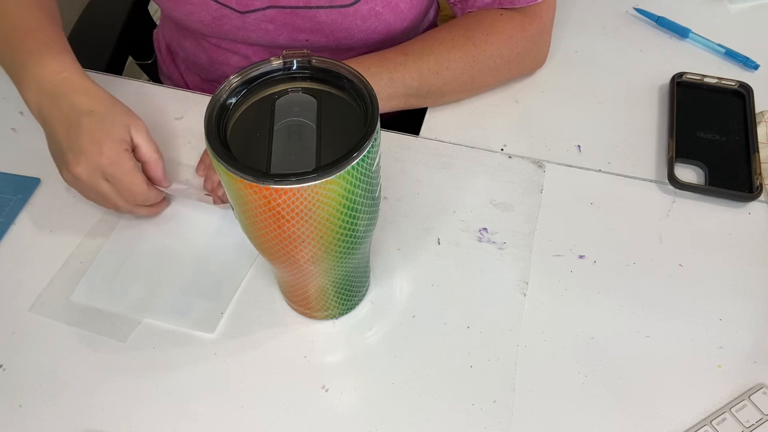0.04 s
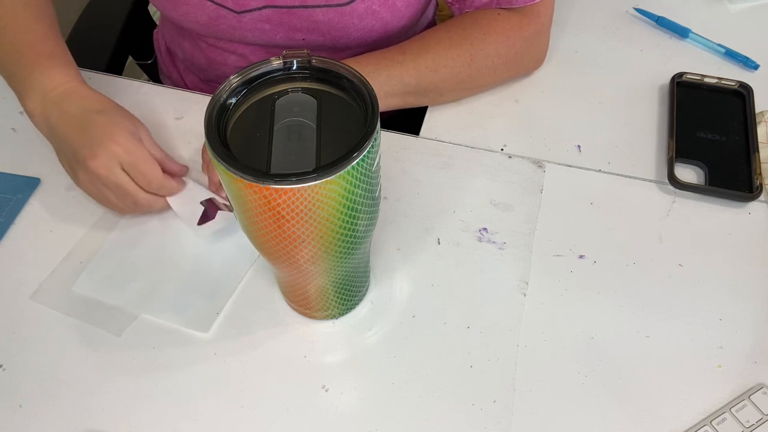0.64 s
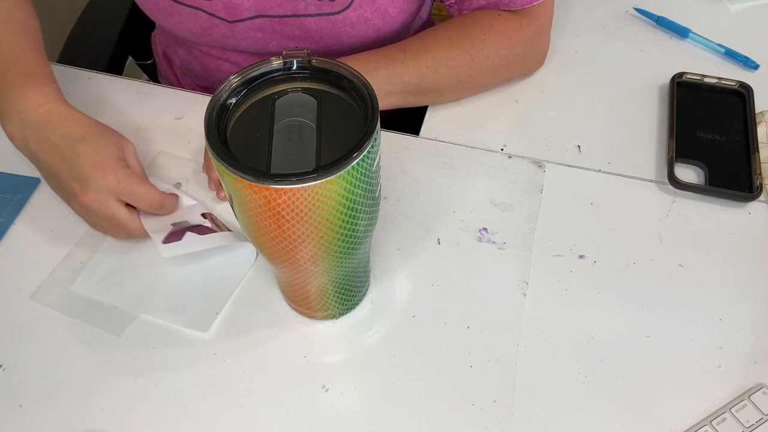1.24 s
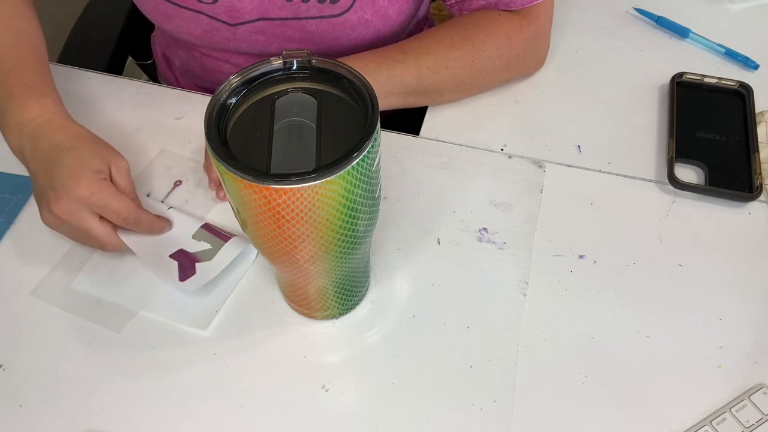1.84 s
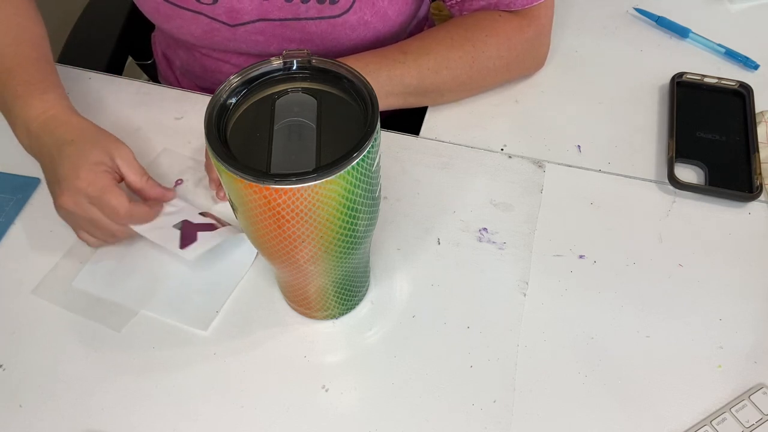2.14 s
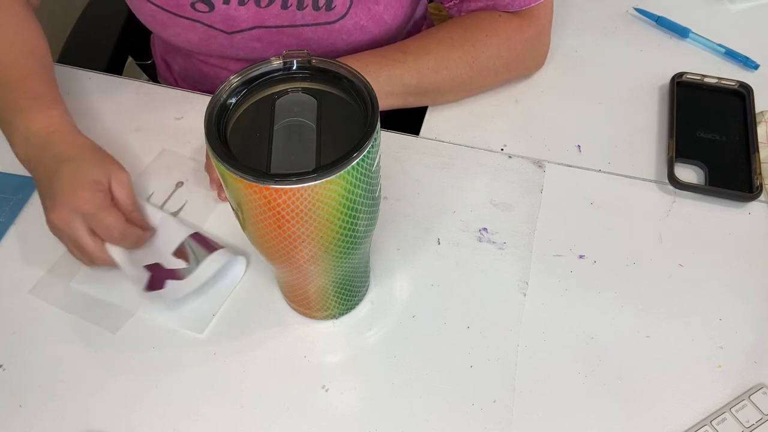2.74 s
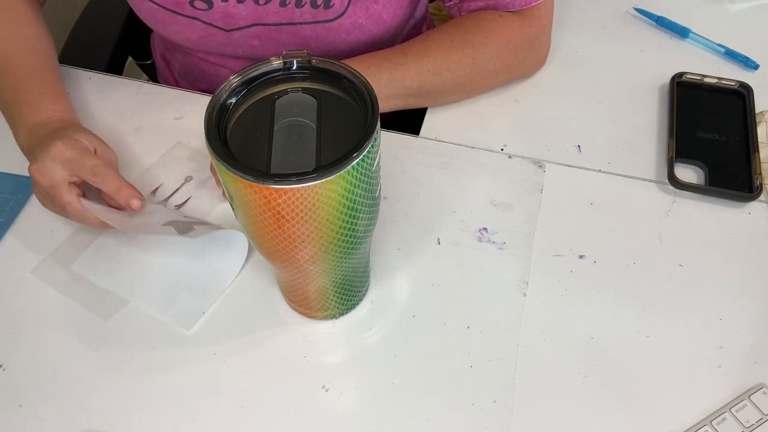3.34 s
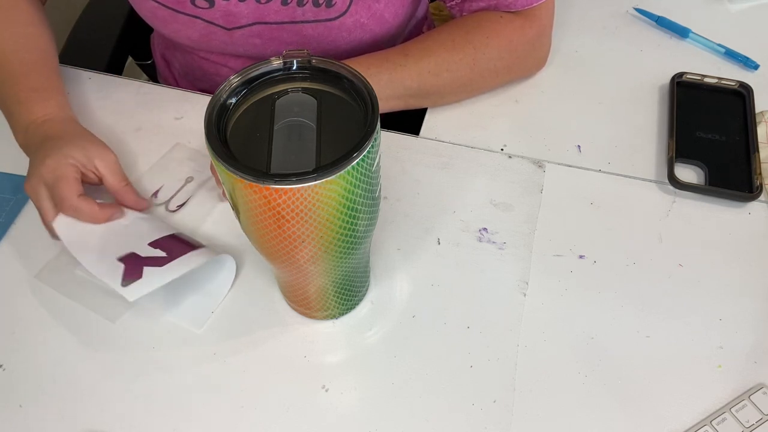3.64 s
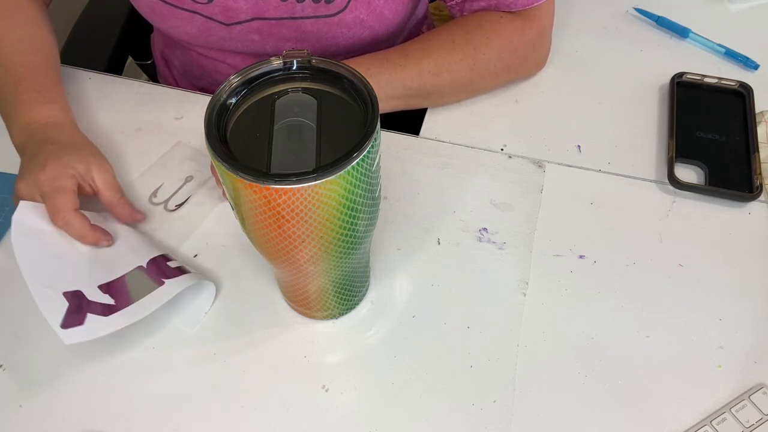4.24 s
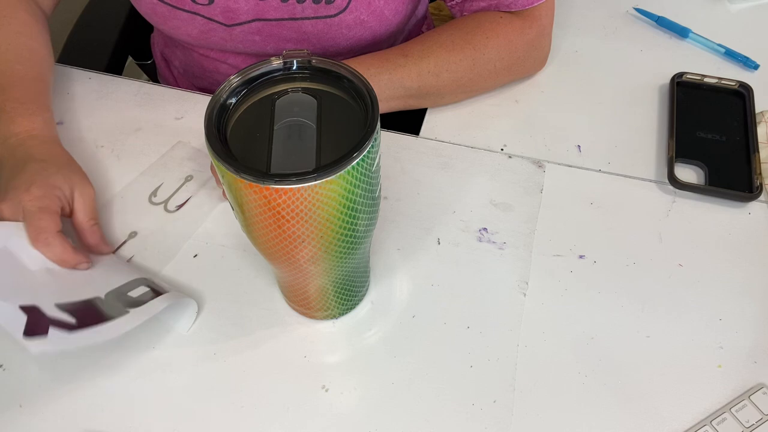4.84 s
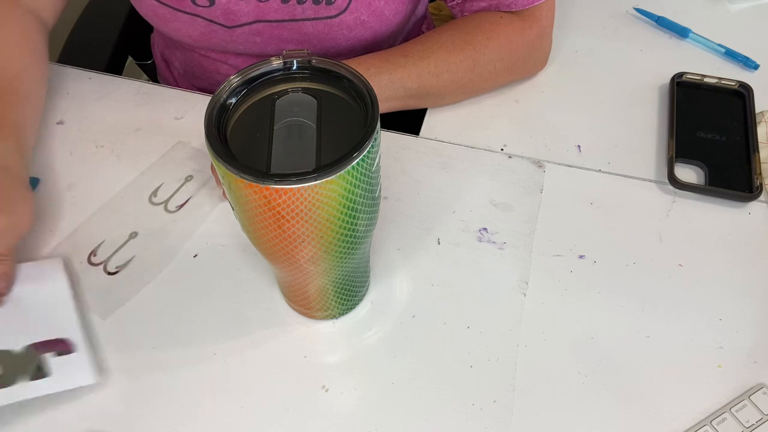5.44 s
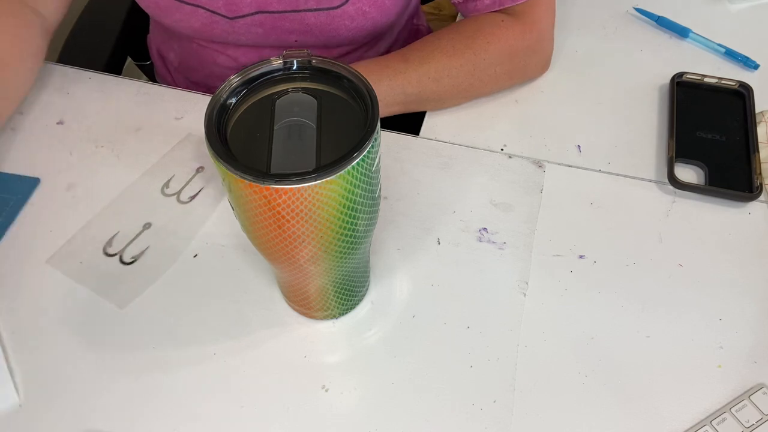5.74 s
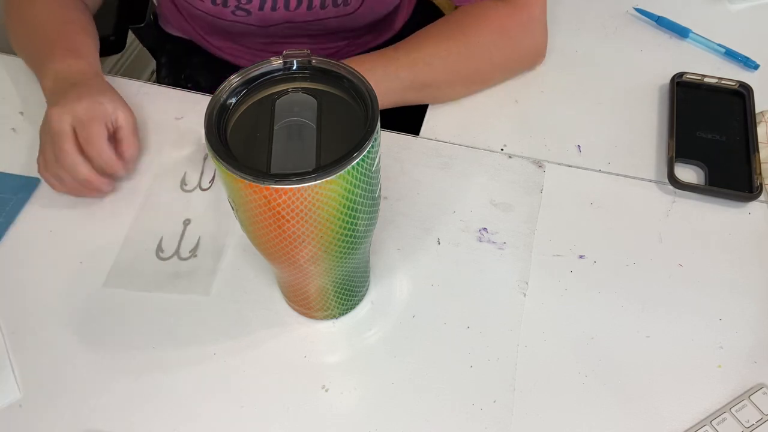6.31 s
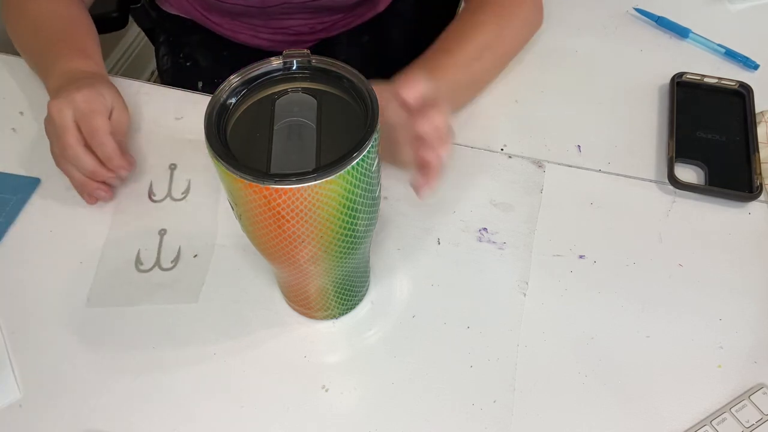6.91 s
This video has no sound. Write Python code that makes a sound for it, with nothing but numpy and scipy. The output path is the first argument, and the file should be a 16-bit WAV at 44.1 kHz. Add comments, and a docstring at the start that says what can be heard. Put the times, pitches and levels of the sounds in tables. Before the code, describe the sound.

Close crackling and sliding of a stiff vinyl sheet being handled, then an arm bumps down on a hollow table.

```python
"""Peeling a vinyl decal

A decal sheet is picked off its transfer tape on a table in a small room, heard from close by.
The stiff film buckles in sharp snaps, ticks as tiny creases give way, and hisses as it slides.
Then the sheet is put aside and an arm comes down, thumping and rubbing the hollow table."""
import sys
import numpy as np
from scipy import signal
from scipy.fft import rfft, irfft, next_fast_len
from scipy.io import wavfile
from scipy.ndimage import uniform_filter1d, map_coordinates

SR = 44100
rng = np.random.default_rng(int(sys.argv[2]) if len(sys.argv) > 2 else 0)


def digitize_waveform(pressure):
    """Quantize a signal to 16-bit integers and store it at the path in sys.argv[1].

    Rows of a 2-D input are taken as channels; values are limited to [-1, 1].
    """
    field = np.atleast_2d(pressure).T
    bounded = np.clip(field, -1, 1)
    quanta = np.round(bounded * 32767).astype(np.int16)
    wavfile.write(sys.argv[1], SR, quanta)


N = 311787  # samples, about 7 s

# Levels in the tables are relative; the functions set the final loudness.
# the quiet room's own noise: f/Hz, level/dB
ROOM_TONE = [(30, -13.5), (100, -15), (240, -14.5), (540, -15.5), (2000, -21.5), (8200, -24),
             (15000, -31.5)]
# how long the room echoes: f/Hz, time to fade by 60 dB/s
ROOM_DECAY = [(150, 0.95), (1000, 0.48), (4000, 0.35), (8000, 0.34), (15000, 0.2)]
# how busy the hands are: t/s, level/dB
HAND_ACTIVITY = [(0, -10), (.2, -7), (.85, -7), (1.1, -2), (1.43, -8.5), (1.8, -1.5), (2.9, 2),
                 (3.55, -5.5), (4.2, -1.5), (5.2, -10), (6.6, -12), (7.05, -38)]
# rumble of hands resting on the table: f/Hz, level/dB
RESTING_SPECTRUM = [(20, -20.5), (45, -8), (62, 1.5), (80, -0.5), (110, -3), (200, -17), (400, -24.5),
                    (700, -23.5), (1500, -52.5)]
# notes the hollow table rings at: f/Hz, level/dB, time to fade by 60 dB/s
TABLE_MODES = [(77.5, 3.5, 0.4), (121, -29.5, 0.26), (186.8, -17.5, 0.25)]
# hand and arm bump the table: t/s, level/dB
BUMPS = [(0.27, -48.5), (0.907, -47.5), (1.338, -50.5), (1.566, -47), (2.341, -54), (2.85, -51.5),
         (2.996, -47.5), (3.925, -55), (5.378, -49), (5.584, -30), (5.599, -20.5), (5.7, -23),
         (5.745, -31.5), (5.782, -28), (5.849, -27.5), (6.085, -41), (6.344, -51), (6.491, -50)]
# fingers, then the arm, drag over the table: t/s, level/dB, fade/(dB per s)
DRAGS = [(0.496, -57.5, 150), (1.07, -57.5, 150), (1.25, -61, 110), (1.555, -56, 198), (2.495, -58.5, 256),
         (3.06, -66, 12), (3.378, -53, 262), (4.545, -58.5, 159), (5.35, -50, 75), (5.578, -42.5, 28.5),
         (6.038, -45, 39.5), (6.27, -54.5, 33.5), (6.51, -61, 147)]
# skin and sleeve rubbing the table: f/Hz, level/dB
RUB_SPECTRUM = [(55, -27.5), (90, -22), (115, -7), (160, -20.5), (270, -21), (480, -25), (680, -27.5),
                (990, -27), (1400, -38), (2200, -42.5), (3500, -65.5)]
# film peels or slides on film: start t/s, end t/s, hiss level/dB, hiss change/dB, scrape over hiss/dB
FILM_STROKES = [(0.079, 0.268, -56.5, 4, -9), (0.378, 0.584, -60, -7.5, -1.5), (0.862, 0.929, -53, 22.5, 0),
                (0.938, 1.007, -60, -14.5, 7), (1.009, 1.129, -46.5, 9, -9), (1.266, 1.331, -57, 30.5, 3.5),
                (1.456, 1.603, -58, 15.5, -2), (1.723, 1.94, -59.5, 4.5, 2), (2.46, 2.512, -76, 13, 20),
                (2.507, 2.615, -45, 1, -13.5), (2.614, 2.742, -47, 5.5, -8), (2.742, 2.83, -54, 9, 4),
                (3.037, 3.444, -64.5, 5.5, 2), (3.588, 3.7, -56.5, 14, -3.5), (3.818, 3.918, -61.5, 2, 0.5),
                (4.218, 4.334, -56.5, 7, -4), (4.46, 4.53, -60, -4, -8.5), (4.542, 4.562, -65, 7.5, 16),
                (4.597, 4.875, -57.5, 11.5, -10), (4.89, 5.052, -59.5, 4, -3),
                (5.26, 5.308, -62.5, 9.5, -7), (5.342, 5.383, -56, -19, 6.5), (5.482, 5.6, -58, 6, -11),
                (5.641, 5.688, -46.5, 3, 3), (5.72, 5.811, -60, 0, 7.5), (5.836, 5.942, -60, -11, -1.5),
                (6.004, 6.105, -58, 12, 0), (6.163, 6.184, -53, 15, -3.5), (6.29, 6.394, -74, 3, 6.5),
                (6.397, 6.437, -67.5, 3, 8.5), (6.573, 6.808, -70, 6.5, -19),
                (6.881, 6.932, -69.5, 1, -7.5)]
# the bright hiss of sliding film: f/Hz, level/dB
HISS_SPECTRUM = [(1500, -46), (3000, -10.5), (4700, -5.5), (6500, -7), (8400, -7), (10000, -9.5),
                 (12600, -10), (13900, -16.5), (15000, -31)]
# its lower scrape: f/Hz, level/dB
SCRAPE_SPECTRUM = [(300, -42), (450, -20.5), (620, -32), (1000, -12.5), (1300, -7), (1760, 2), (2500, -8),
                   (4500, -8), (6000, -28), (10000, -57.5)]
# a patch of film buckles: t/s, level/dB, patch pitch f/Hz, crispness/dB, flap of the whole sheet/dB
BUCKLES = [(0.1643, -45, 870, -11, 13.5), (0.243, -44, 1230, 2, 5), (0.5071, -52.5, 1000, -5.5, 12),
           (0.5583, -50.5, 4370, -33, 3.5), (0.6482, -41.5, 4070, 13, -1.5), (1.1209, -34, 2080, -4, -11.5),
           (1.2452, -54.5, 2540, -7, -2), (1.32, -47.5, 950, 5.5, 3.5), (1.515, -38, 2960, -4.5, -0.5),
           (1.595, -50.5, 1610, -5.5, 10), (1.6446, -36.5, 2700, 17.5, -13),
           (1.9273, -51, 2530, -15.5, 14.5), (1.9421, -48, 3830, -7.5, 7.5), (2.0152, -42.5, 2210, -9.5, 2),
           (2.1858, -48.5, 1830, -20, -21.5), (2.204, -36, 1340, 7.5, 2), (2.3194, -34, 1510, 11.5, 3.5),
           (2.5301, -50.5, 3780, 13, -17), (2.715, -43.5, 2220, 5.5, -7), (2.7461, -43.5, 2400, 14.5, -2),
           (2.782, -47, 4620, 7, -4), (2.8232, -37.5, 1935, -17.5, -19), (2.8463, -38.5, 3440, 10, -4),
           (2.9302, -46.5, 1680, -15, 2), (2.9351, -39.5, 1860, 3.5, -1.5), (3.009, -45.5, 1200, -9, -2),
           (3.118, -53, 1910, -25, -9), (3.174, -61.5, 4100, 8, 11.5), (3.224, -58.5, 1700, -26, -3),
           (3.2841, -42, 2500, -6, -0.5), (3.462, -46.5, 2400, 10, 5.5), (3.4733, -47, 1680, 1.5, -4),
           (3.6594, -44.5, 1950, 11, 9.5), (3.7099, -34.5, 1084, 12, 3.5), (3.9205, -31, 1230, 11.5, 7),
           (4.0845, -57.5, 1640, -18, 2), (4.0953, -41, 1580, 9, -2.5), (4.1664, -51.5, 2350, -13.5, 3),
           (4.281, -50.5, 1880, -14.5, -1.5), (4.34, -39, 6240, 11.5, -2), (4.5628, -39.5, 1730, 2, 3.5),
           (4.8539, -44, 4430, 5.5, 2.5), (4.9887, -64, 6100, 20.5, -6), (5.092, -69, 5430, 21, 7),
           (5.11, -65.5, 1960, 20.5, -9), (5.3784, -43.5, 815, -1.5, 1), (5.6451, -53.5, 1090, 18.5, 12),
           (5.908, -58, 1680, -18, 7), (6.0049, -60, 1940, -14.5, 22), (6.0438, -54, 1740, 11, 5),
           (6.188, -53, 4800, -5, -2), (6.4044, -64, 2140, -4, 2), (6.5093, -64.5, 1670, 3, 7),
           (6.6735, -63.5, 4280, 18.5, 1)]
# borders of a snap's five frequency bands: f/Hz
BAND_EDGES = [170, 650, 1500, 2800, 6000, 15000]
# a middling snap, one row a band: level/dB, share of the crispness, share of the flap
BAND_MIX = [(-14, 0.12, 0.98), (-5.5, 0.061, 0), (0.13, 0.018, 0.042), (3.5, 0.23, 0.12), (-6.5, 1, 0)]
# the tone colour all snaps share: f/Hz, level/dB
SNAP_SPECTRUM = [(170, -4), (285, -2), (420, 9), (490, 8), (620, -7), (850, 15.5), (1200, 13), (1480, 1.5),
                 (1800, 4.5), (3200, 6.5), (4400, 8.5), (5600, 3.5), (7000, 5), (12500, -1), (15500, -18)]
# notes the whole sheet rings at: f/Hz, width/Hz, level/dB
SHEET_MODES = [(420, 120, -10.5), (1040, 41, -5.5), (1282, 18, 11.5), (1825, 310, 7)]
# notes the buckling patch rings at: multiple of its pitch, level/dB
PATCH_RING = [(1, 10), (1.5, -16.5)]


def amp(db):
    """Turn decibels into a gain."""
    return 10 ** (np.asarray(db) / 20)


def unit(x):
    """Scale x to an average (rms) size of 1."""
    return x / np.sqrt(np.mean(x ** 2) + 1e-20)


def along(points, hz):
    """Read a table of (frequency, value) at hz, on a log frequency axis."""
    f, v = np.transpose(points)
    return np.interp(np.log(hz + 1), np.log(f + 1), v)


def wobble(rate):
    """A smooth random curve through rate points a second."""
    points = rng.standard_normal(int(N * rate / SR) + 4)
    return map_coordinates(points, [np.arange(N) * rate / SR])


def filtered(x, response):
    """Multiply each frequency in x by response(hz)."""
    size = next_fast_len(N + SR // 2)
    return irfft(rfft(x, size) * response(np.fft.rfftfreq(size, 1 / SR)), size)[..., :N]


def ring_from(gain, size=2048):
    """The promptest ring that has the spectrum gain(hz): a minimum-phase impulse response."""
    cepstrum = irfft(np.log(np.maximum(gain(np.fft.rfftfreq(size, 1 / SR)), 1e-6)))
    cepstrum[1:size // 2] *= 2
    cepstrum[size // 2 + 1:] = 0
    return irfft(np.exp(rfft(cepstrum)))


def noise(spectrum, channels=2):
    """Noise of size 1, shaped by a spectrum table."""
    return unit(filtered(rng.standard_normal((channels, N)), lambda hz: amp(along(spectrum, hz))))


def add(track, start_s, sound):
    """Mix a sound into a track."""
    i = max(round(start_s * SR), 0)
    part = track[..., i:i + sound.shape[-1]]
    part += sound[..., :part.shape[-1]]


def stereo(waves, own_share, lag_ms):
    """Of three waves, both sides hear the first (left sooner); each side also gets one of its own."""
    shared = filtered(waves[0], lambda hz: np.exp(np.outer([1, -1], 1j * np.pi * hz * lag_ms / 1000)))
    return np.sqrt(1 - own_share) * shared + np.sqrt(own_share) * waves[1:]


def friction(spectrum, grain):
    """Rubbing is countless tiny slips; more grain makes their sizes more uneven."""
    slips = rng.standard_normal((3, N)) * np.exp(grain * wobble(1500))
    shaped = filtered(slips, lambda hz: amp(along(spectrum, hz)))
    return unit(stereo(shaped, own_share=0.92, lag_ms=0.11))


def busy_db():
    """How busy the hands are at each sample."""
    return np.interp(np.arange(N) / SR, *np.transpose(HAND_ACTIVITY))


def room_tone(level_db=-80):
    """The faint, steady noise of the room."""
    return amp(level_db) * noise(ROOM_TONE)


def room_echo(x, build_s=0.00028):
    """The room's smooth echo of x; high notes die away soonest."""
    hz, t, spectra = signal.stft(rng.standard_normal((2, SR // 2)), SR, nperseg=256)
    fade = amp(-60 * t / along(ROOM_DECAY, hz)[:, None])
    tail = signal.istft(spectra * fade * (1 - np.exp(-t / build_s)), SR, nperseg=256)[1]
    return signal.fftconvolve(np.atleast_2d(x), tail / np.linalg.norm(tail[0]), axes=1)[:, :N]


def table_thumps(rise_s=0.014, resting_db=-64, low_hz=48):
    """Soft bumps set the hollow table booming; resting hands keep it faintly rumbling."""
    t = np.arange(SR) / SR
    ring = sum(amp(db - 60 * t / t60) * np.sin(2 * np.pi * hz * t) for hz, db, t60 in TABLE_MODES)
    boom = (1 - np.exp(-t / rise_s)) * ring
    top = np.zeros(N)
    for start_s, db in BUMPS:
        add(top, start_s, amp(db) * boom)
    # the table gives off little sound below its lowest note
    top = filtered(top, lambda hz: 1 / np.sqrt(1 + (low_hz / (hz + 1)) ** 6))
    top += amp(resting_db + .5 * busy_db()) * noise(RESTING_SPECTRUM, channels=1)[0]
    # the boom reaches left and right out of step (phases in radians)
    return filtered(top, lambda hz: np.exp(1j * np.outer([-.39, .39], np.ones_like(hz))))


def arm_rub(level_db=-1.5, unsteady_db=3.0, attack_s=0.011, stall_db=11):
    """Skin and sleeve rub dully over the table: each drag starts quickly, slows down and stalls."""
    t = np.arange(N) / SR
    speed = np.zeros(N)
    for start_s, db, fade in DRAGS:
        rise = np.exp(np.minimum(t - start_s, 0) / attack_s)
        lost_db = fade * np.maximum(t - start_s, 0)
        speed += amp(db - lost_db) * rise / (1 + (lost_db / stall_db) ** 6)
    return speed * amp(level_db + unsteady_db * wobble(40)) * friction(RUB_SPECTRUM, grain=0.34)


def crinkles(per_s=16, level_db=-47.5, spread_db=11, life_s=0.00085, low_hz=1200, room_db=-8):
    """Tiny creases give way at random, ticking louder when the hands are busy."""
    t = np.arange(SR // 50) / SR
    hands_db = busy_db()
    ticks = np.zeros((3, N))
    for when, size, pitch in rng.random((int(per_s * N / SR), 3)):
        force = rng.standard_normal((3, len(t))) * np.exp(-t / life_s)
        tick = signal.lfilter(*signal.iirpeak(low_hz * 5 ** pitch, Q=2.5, fs=SR), force)
        peak = amp(level_db + hands_db[int(when * N)] + spread_db * size)
        add(ticks, when * N / SR, peak * tick / np.abs(tick).max())
    return stereo(ticks, own_share=0.97, lag_ms=0.054) + amp(room_db) * room_echo(ticks[1:])


def pull(idle_hiss_db=-66, idle_scrape_db=-63, edge_s=0.02):
    """Strength of hiss and scrape: busy hands rustle the film; in a stroke the hiss swells or fades."""
    t = np.arange(N) / SR
    drive = amp(busy_db() + [[idle_hiss_db], [idle_scrape_db]])
    for start, end, hiss_db, change_db, scrape_db in FILM_STROKES:
        i, j = np.searchsorted(t, [start, end])
        drive[0, i:j] = amp(hiss_db + change_db * np.linspace(-.5, .5, j - i))
        drive[1, i:j] = amp(hiss_db + scrape_db)
    return uniform_filter1d(drive, int(edge_s * SR))


def film_slide(level_db=-1, unsteady_db=2.0, room_db=-5, bend_octaves=.4, bends_per_s=5):
    """The film drags unsteadily over its backing; its scrape shifts in pitch as the sheet bends."""
    hiss_gain, scrape_gain = pull() * amp(unsteady_db * wobble(70))
    slack = friction(SCRAPE_SPECTRUM, grain=0.41)
    taut = friction(np.multiply(SCRAPE_SPECTRUM, [2 ** bend_octaves, 1]), grain=0.41)
    bend = np.pi / 4 * (1 + np.tanh(wobble(bends_per_s) - .5))
    scrape = np.cos(bend) * slack + np.sin(bend) * taut
    hiss = friction(HISS_SPECTRUM, grain=.33)
    drag = amp(level_db) * (hiss_gain * hiss + scrape_gain * scrape)
    return drag + amp(room_db) * room_echo(drag)


def sheet_ring(modes, bounce_s, hollow_db=3, hollow_hz=3000):
    """The film rings at its modes; sound bouncing off the table makes the lower tones hollow."""
    def gain(f):
        ripple_db = hollow_db * np.cos(2 * np.pi * f * bounce_s) / (1 + (f / hollow_hz) ** 2)
        peaks = sum(amp(db) / (1 + (2 * (f - hz) / width) ** 2) for hz, width, db in modes)
        return amp(along(SNAP_SPECTRUM, f) + ripple_db) * (1 + peaks)
    return ring_from(gain)


def snap_levels(patch_hz, crisp_db, flap_db, lift_db=8, width_octaves=0.59):
    """Level of each band: the patch lifts its own pitch, crispness the top, flapping the bottom."""
    centres = np.sqrt(np.multiply(BAND_EDGES[:-1], BAND_EDGES[1:]))
    lift = lift_db * np.exp(-.5 * (np.log2(centres / patch_hz) / width_octaves) ** 2)
    return np.dot(BAND_MIX, [1, crisp_db, flap_db]) + lift


def snap_shape(t, hz, crisp_db, flap_db, creak_s=.0088, crack_s=.0032, spike_s=.0006, flutter_s=.019):
    """One band's loudness over time: a dull creak of strain, a bright crack at t = 0, then flutter."""
    before, after = np.minimum(t, 0), np.maximum(t, 0)
    build_s = min(.001 * amp(flap_db - .13 * crisp_db), .0016)  # flapping builds slowly, crisp fast
    creak = amp(-19) / np.hypot(1, hz / 2500) * np.exp(before / creak_s)
    life_s = crack_s * (hz / 2000) ** -.067  # plastic damps high bands soonest
    spike = amp(8) / np.hypot(1, 9000 / hz) * np.exp(-after / spike_s)  # the instant of giving way
    flutter = amp(-18 + .3 * flap_db) * np.exp(-after / flutter_s)
    return np.where(t < 0, np.exp(2 * before / build_s) + creak, np.exp(-after / life_s) + flutter + spike)


def film_snaps(patch_db=9, patch_q=7, ragged=0.19, room_db=-12, directions=4, lead_s=.014, span_s=.01):
    """A patch of strained film suddenly buckles and rings, shaking the whole sheet."""
    t = np.arange(SR // 14) / SR - lead_s
    bands = list(zip(BAND_EDGES, BAND_EDGES[1:]))
    filters = [signal.butter(4, band, "band", fs=SR, output="sos") for band in bands]
    beams = np.zeros((directions, N))  # the sheet sounds different in each direction
    for start_s, level_db, patch_hz, crisp_db, flap_db in BUCKLES:
        patch = [(k * patch_hz, k * patch_hz / patch_q, patch_db + db) for k, db in PATCH_RING]
        bounce_s = 0.000901 * (.5 + rng.random())  # the delay varies with the sheet's height
        # the patch aims its ring at the listener; the rest of the sheet feeds the room
        front = sheet_ring([*SHEET_MODES, *patch], bounce_s)
        rings = np.array([front] + [sheet_ring(SHEET_MODES, bounce_s)] * (directions - 1))
        # the crease runs in fits and starts
        fits = np.exp(ragged * unit(uniform_filter1d(rng.standard_normal(len(t)), size=20)))
        force = fits * rng.standard_normal((directions, len(t)))
        snap = np.zeros_like(force)
        for band, sos, band_db in zip(bands, filters, snap_levels(patch_hz, crisp_db, flap_db)):
            push = snap_shape(t, np.mean(band), crisp_db, flap_db) * force
            part = signal.sosfilt(sos, signal.fftconvolve(push, rings, axes=1)[:, :len(t)])
            part /= np.linalg.norm(part, axis=1, keepdims=True)
            snap += amp(level_db + band_db) * np.sqrt(span_s * SR) * part  # as if held for span_s
        add(beams, start_s - lead_s, snap)
    echo = sum(room_echo(beam) for beam in beams[1:]) / np.sqrt(directions - 1)
    return stereo(beams[:3], own_share=0.52, lag_ms=0.094) + amp(room_db) * echo


def scene(left_db=1.15):
    """Sheet, table and arm over the room tone; the sheet's lower tones sit a little to the left."""
    sheet = film_snaps() + crinkles() + film_slide()
    sheet = filtered(sheet, lambda hz: amp(np.outer([1, -1], left_db / (1 + (hz / 2200) ** 4))))
    return sheet + table_thumps() + arm_rub() + room_tone()


def record(dry, split_hz=6900, lag_ms=0.1909, top_hz=15700):
    """The microphone's right treble is its left treble, late and flipped; nothing passes above top_hz."""
    left, right = dry
    high = lambda hz: 1 / np.sqrt(1 + (split_hz / (hz + 1)) ** 20)
    treble = filtered(left, lambda hz: -high(hz) * np.exp(-2j * np.pi * hz * lag_ms / 1000))
    right = treble + filtered(right, lambda hz: np.sqrt(1 - high(hz) ** 2))
    return filtered(np.array([left, right]), lambda hz: hz < top_hz)


dry = scene()
out = record(dry)
digitize_waveform(out)
```